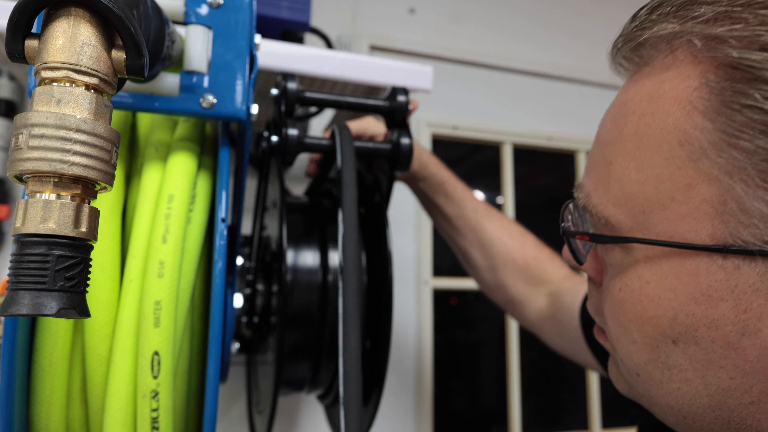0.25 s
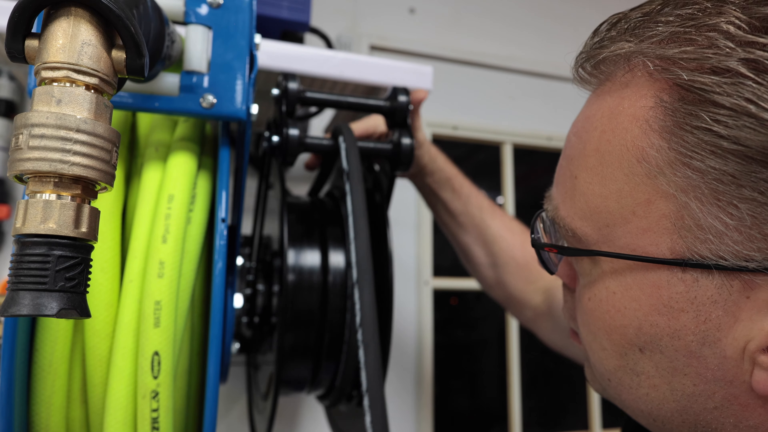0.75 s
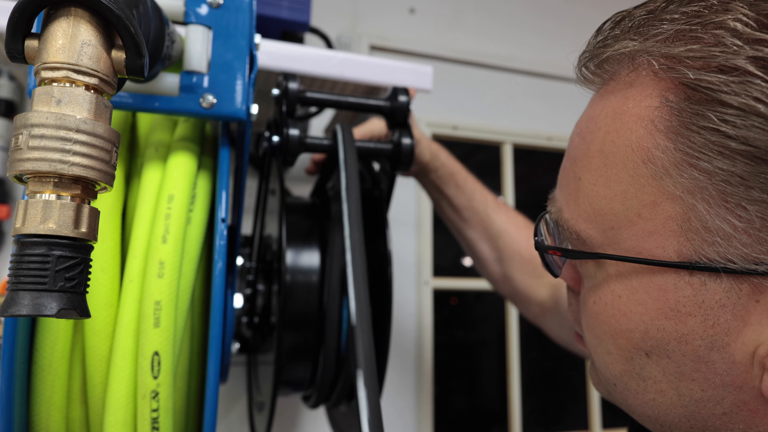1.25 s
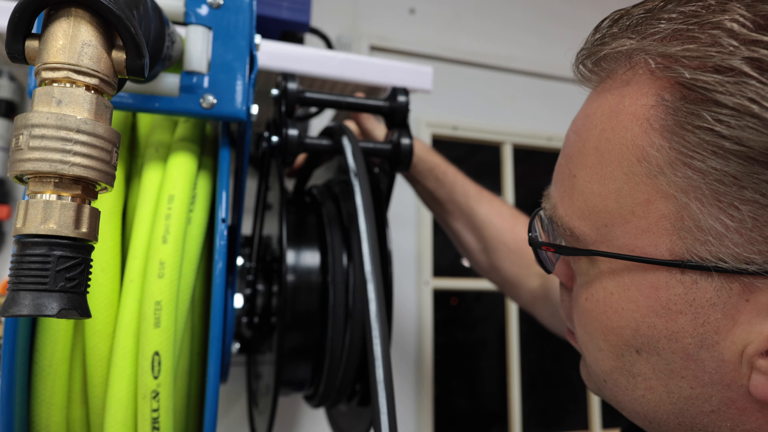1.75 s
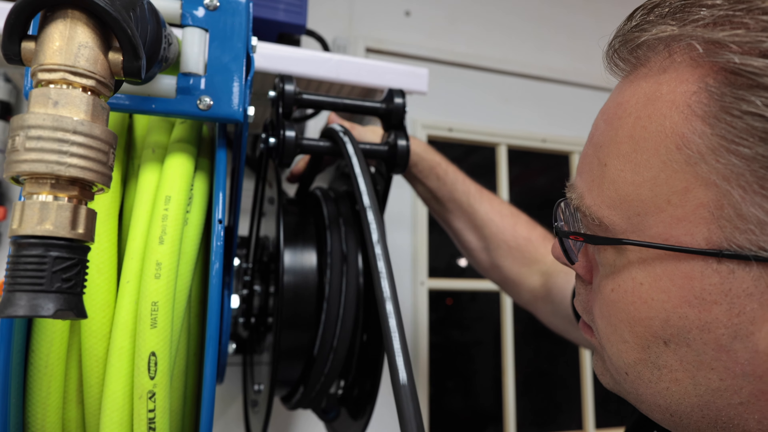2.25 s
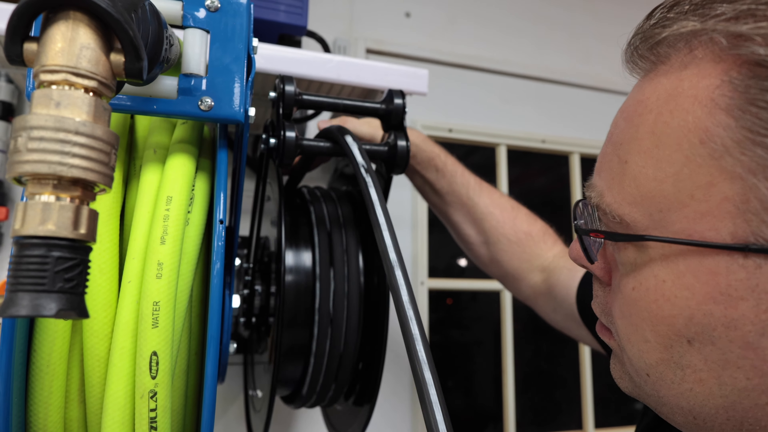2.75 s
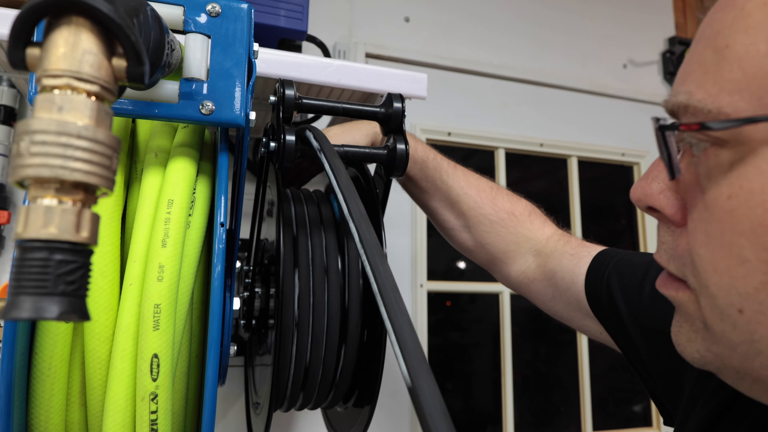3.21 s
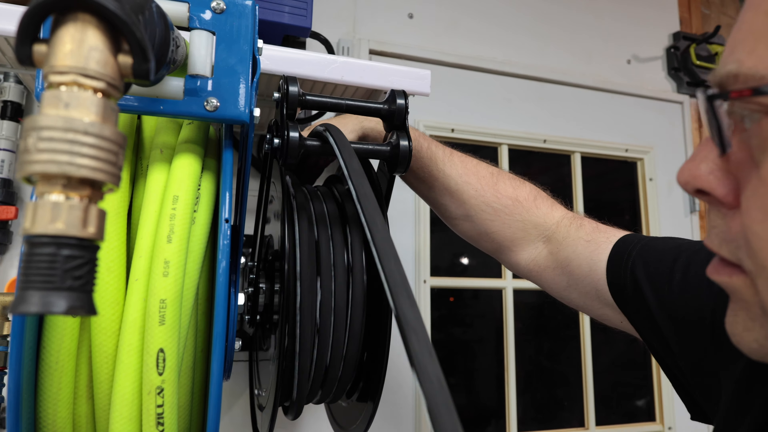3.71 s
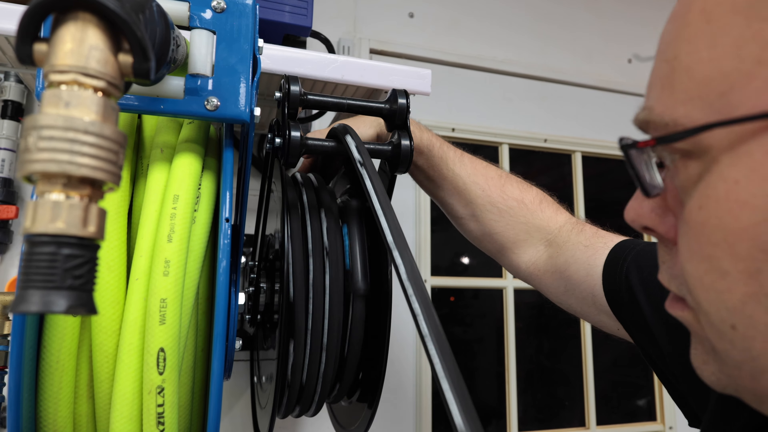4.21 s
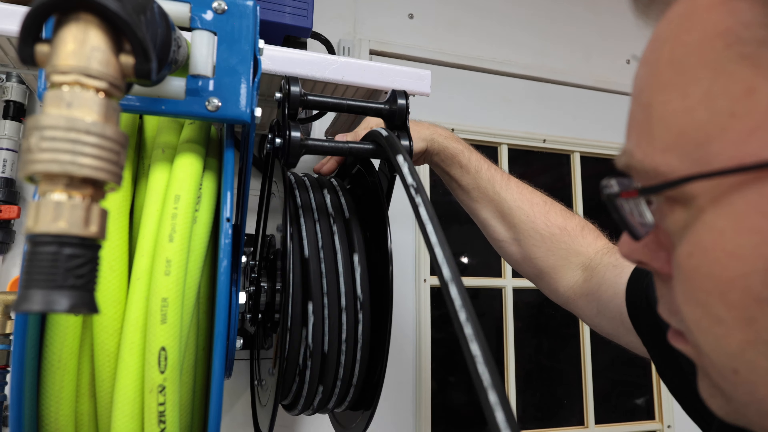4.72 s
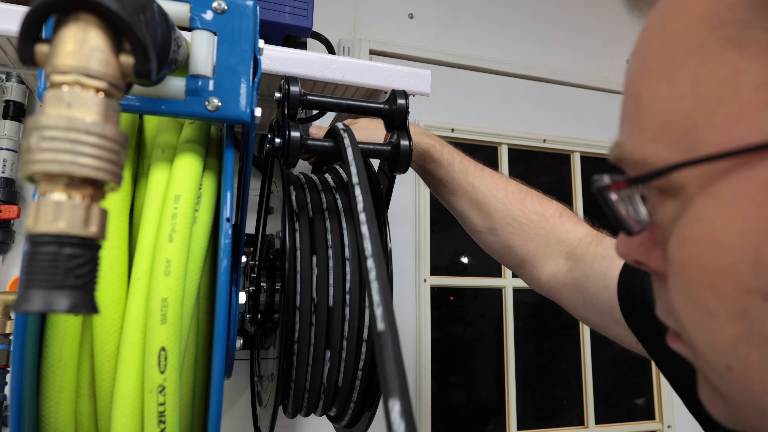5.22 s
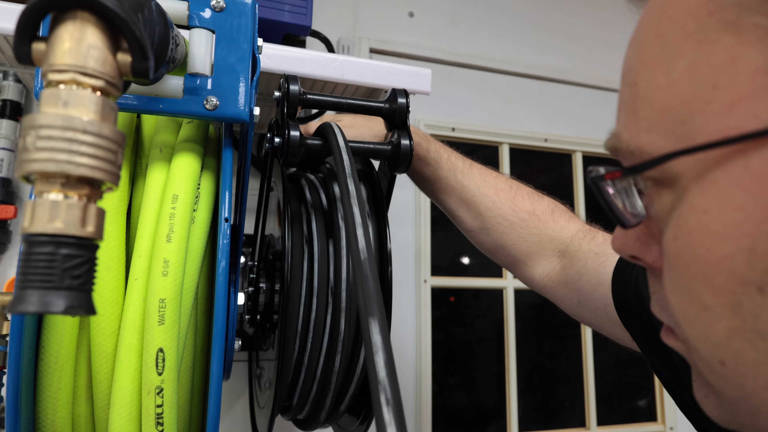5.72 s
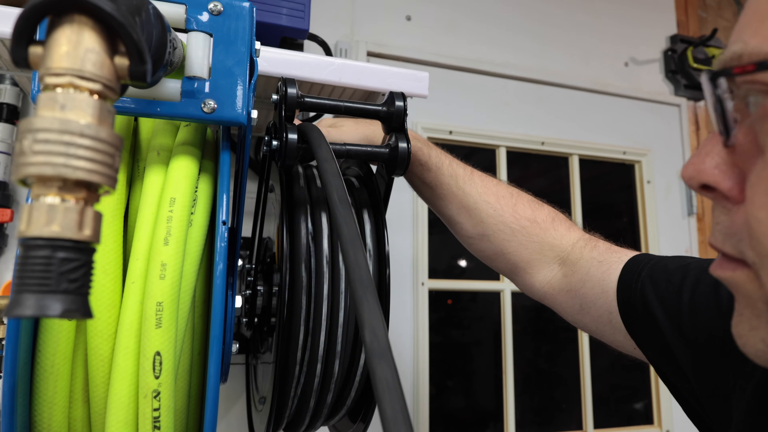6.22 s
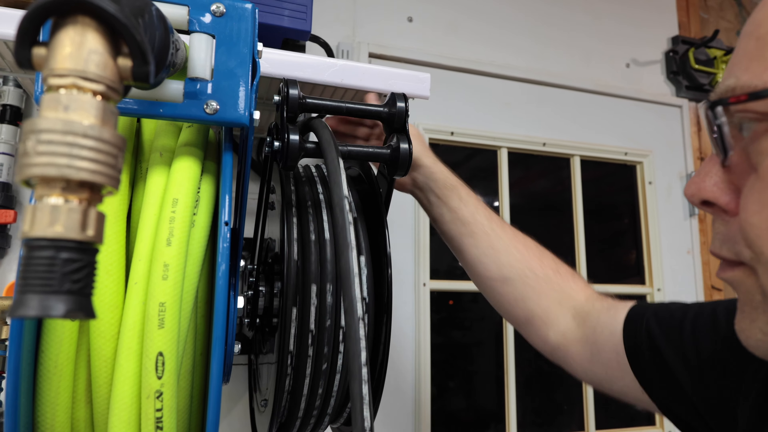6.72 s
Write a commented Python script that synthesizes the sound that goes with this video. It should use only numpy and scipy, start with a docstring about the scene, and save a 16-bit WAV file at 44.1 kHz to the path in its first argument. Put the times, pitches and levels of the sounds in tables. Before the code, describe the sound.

In a garage, a spring-driven steel reel winds in a stiff hose, close to the microphone. The pawl clacks over the ratchet in quick groups, ringing the metal, while the hose rubs the guide rollers and knocks dully on the drum over a low handling rumble. After a split second of silence, the winding returns sped up and quieter, in short gusts of rattle.

```python
"""A pawl clacks in groups over the ratchet teeth of a sheet-steel spring reel as it winds in a stiff hose.
The place is a garage, the camera microphone close to the reel. Each blow rings the steel; the hose rubs
the guide rollers, knocks the drum and flops, over a low rumble of handling near the microphone.
After a cut to brief silence the winding is heard sped up and quieter, chopped into short gusts of rattle."""
import sys
import numpy as np
from scipy import signal
from scipy.fft import rfft, irfft, next_fast_len
from scipy.io import wavfile
from scipy.ndimage import uniform_filter1d

SR = 44100
rng = np.random.default_rng(int(sys.argv[2]) if len(sys.argv) > 2 else 0)


def dump_mix(stems):
    """Bounce the given channels to the path in sys.argv[1] as a 16-bit WAV at rate SR."""
    frames = np.atleast_2d(stems).T  # one column per channel
    limited = np.clip(frames, -1, 1)  # hard clip at full scale
    pcm = np.round(limited * 32767).astype(np.int16)
    wavfile.write(sys.argv[1], SR, pcm)


N = 306615
T = np.arange(N) / SR
SILENCE_S = (2.495, 2.549)
SLOW, SPED_UP = T < SILENCE_S[0], T > SILENCE_S[1]

# Reverberation of the garage: f/Hz, t60/s before each passage shortens it
GARAGE_DECAY = [(400, 0.64), (1200, 0.66), (3500, 0.55), (9000, 0.35)]
# Handling near the microphone and the hose flopping:
# t/s, rumble/dB, nominal rise/ms, nominal fall/ms, drone/dB and flop/dB re the rumble
LOW_LURCHES = [(0.13, -63, 150, 200, -13, -16), (0.53, -67.5, 270, 90, 4, 19.5),
               (0.78, -64.5, 115, 150, 14, 23.5), (1.03, -62.5, 120, 200, 6, 19),
               (1.3, -57, 130, 151, 11, 18.5), (1.46, -61.5, 65, 60, 16, 24),
               (1.6, -35.5, 35, 90, -5.5, -19), (1.665, -32.5, 60, 110, -2, -11.5),
               (1.82, -46, 90, 60, -1.5, -7), (2.15, -43, 91, 150, 5, 1), (2.25, -49.5, 70, 200, -1, -20),
               (2.44, -51, 110, 120, -10.5, -22), (2.68, -54, 40, 90, 8, -3), (2.76, -66, 40, 70, 10, 5),
               (2.951, -46, 50, 51, -2, -7), (3.34, -62, 40, 40, -2, -3), (3.43, -74.5, 30, 60, 17, 21),
               (3.53, -70, 29.9, 40.2, 14, -7), (3.8, -69, 40, 90, 9, 20.5), (4.37, -78, 20, 60, 20, 23),
               (4.605, -75, 20, 40, 26, 34.5), (4.65, -79, 64, 60, 5, 34), (4.78, -78, 60, 90, 18, 12),
               (5.03, -60, 50, 50, -3, -8), (5.09, -58.5, 30, 60, -13, -11), (5.19, -60, 50, 50, 4.5, -11),
               (5.35, -80, 50, 90, 20.5, 13), (5.61, -65, 30, 90, 11, 3), (5.97, -60, 57, 60, 7, 8),
               (6.15, -45, 30, 30, -6, -10), (6.309, -39.5, 40, 50, -8.5, -17),
               (6.415, -43.5, 40, 70.5, -3, -18), (6.68, -79, 30, 60, 11, 18)]
# Hose running slowly over the guide rollers: t/s, nominal rubbing/dB, roller f/Hz, whirr/dB
HOSE_RUN = [(0.0, -50.5, 1014, -53), (0.12, -64, 1043, -62), (0.33, -64, 1150, -56.5),
            (0.44, -66.5, 1170, -57), (0.6, -67, 1160, -70.5), (0.74, -65, 1157, -67),
            (0.83, -56, 1014, -51), (0.95, -51.5, 1027, -43.5), (1.06, -47, 890, -43),
            (1.15, -57, 1101, -52), (1.27, -48, 971, -43), (1.38, -45.5, 1029, -40), (1.5, -53, 973, -51),
            (1.69, -61, 1051, -54.5), (1.8, -65, 1000, -58.5), (1.91, -56, 1000, -50),
            (2.07, -41, 1015, -34), (2.2, -64.5, 891, -59), (2.3, -61.5, 1056, -62),
            (2.5, -65.5, 1072, -55)]
# Short hollow rubs of the hose: t/s, level/dB, rise and fall/ms, f/Hz
HOLLOW_RUBS = [(2.765, -52, 20, 419), (3.18, -54, 20, 400), (3.805, -49, 18, 400), (4.655, -39, 37, 490),
               (5.385, -53, 17, 430), (5.555, -52, 24, 429), (5.85, -52.5, 20, 430),
               (5.975, -47, 19, 450.6), (6.2, -51, 20, 430)]
# Hose striking the drum: t/s, peak/dB, boost of the modes after the second/dB, of the hollow second/dB
HOSE_KNOCKS = [(0.104, -46, 10, 19), (0.412, -41.5, -4, 2), (0.474, -21, 3, 6.5), (0.733, -25.5, 3.5, -8.5),
               (1.063, -36.5, 3.5, 1), (1.251, -30, 3, -4.5), (1.934, -21.5, -4, -7.5),
               (2.132, -35, 3.5, 0.5)]
# Low modes of the drum: f/Hz, relative level/dB, t60/s
DRUM_MODES = [(130.3, -4, 0.29), (270.8, -6, 0.34), (162, -7, 0.16), (398, -1, 0.087), (603.6, -7, 0.16),
              (690, -3.5, 0.049), (1170, -11, 0.099)]
# Blows that ring the flange: t/s, nominal level/dB
FLANGE_BLOWS = [(0.02, -44.5), (0.11, -44), (0.37, -41), (0.73, -65), (1.08, -44), (1.25, -27), (1.39, -27),
                (1.429, -31), (1.47, -22.5), (1.93, -31), (2.15, -21.5), (2.46, -46.5), (2.67, -36),
                (2.96, -37), (3.17, -50), (3.37, -51), (3.718, -34), (4.03, -35), (4.141, -24.5),
                (4.305, -40), (4.445, -33.5), (5.18, -48), (5.61, -38.5), (5.895, -33), (6.039, -35),
                (6.14, -36), (6.29, -43), (6.68, -45), (6.8, -67)]
# Modes of the sheet steel: f/Hz, width/Hz before each passage scales it, relative level/dB
STEEL_MODES = [(775, 67, -2), (969, 32, -6), (1520, 41, -1), (1980, 24, -8), (2120, 26, -6), (2340, 50, -3),
               (2800, 29, -6), (2980, 37, -5), (3210, 71, 0), (3660, 65, -9), (4200, 35, -13),
               (4440, 71, -12), (5430, 88, -17), (6190, 100, -10), (6800, 52, -14), (8560, 59, -21),
               (8980, 40, -20), (9320, 65, -16), (9990, 75, -22), (10200, 34, -21), (10800, 210, -21)]
# Broad response of the steel between its modes: f/Hz, relative level/dB
STEEL_BODY = [(300, -22), (800, -6.5), (1300, -9), (2000, -15), (3200, -12.5), (4200, -18.5), (5200, -21.5),
              (7000, -21), (10000, -24.5), (15000, -41.5)]
# Bands of the steel (pawl, drum, tick, sizzle, clink, chime, clunk): low f/Hz, high f/Hz
STEEL_BANDS = [(1800, 5000), (500, 1800), (5000, 9000), (9000, 17000), (3100, 3350), (6050, 6350),
               (720, 860)]
# Gusts of sped-up rattle: crest t/s, level/dB, nominal rise/ms, nominal fall/ms,
# then weight on the drum/dB, tick/dB and clink/dB re the pawl band
RATTLE_GUSTS = [(2.57, -47.5, 18, 26, -3.5, -3.5, -13), (2.632, -47, 51, 100, -6.5, -20, -20),
                (2.679, -41, 37, 21, 1.5, 0, -25), (2.741, -47.5, 4.4, 42, -7, -6, 2),
                (2.82, -46.5, 58, 73, -6, -20, -11), (2.844, -43, 11, 23, 4, 2.5, -19),
                (2.894, -45, 14, 51, -3, 0, -6), (2.931, -36.5, 42, 34, -5.5, -11.5, -23),
                (2.95, -51.5, 4, 31, 10, 8.5, -17), (3.087, -49, 15, 46, -10, -13.5, -16),
                (3.153, -39, 50, 44, -4.5, -8.5, -19), (3.214, -43, 21, 7.6, 1.5, 1, -12),
                (3.233, -38.5, 24, 61, -5, -7, -16), (3.271, -47, 17, 20, 8, 0, -11),
                (3.331, -42.5, 27, 83, -7.5, -8.5, 3), (3.372, -39.5, 43, 22, 0.5, -8.5, -19),
                (3.414, -50, 6.5, 35, 0, 7, -13), (3.455, -49.5, 85, 42, -9, -17, -17),
                (3.571, -59.5, 5, 13, 5.5, -29.5, -16), (3.683, -57.5, 20, 21, -1.5, -22, -22),
                (3.706, -51, 10.4, 23, 18.5, 8.5, -14), (3.794, -43, 22, 10.7, -7, -13, 2),
                (3.865, -41.5, 85, 14, -5.5, -19, 3), (3.874, -48, 11, 21, 10, 4.5, -12),
                (3.94, -43, 16, 16, -12, -1, -6), (3.999, -46.5, 97, 53, -3.5, -22, -23),
                (4.019, -43.5, 11, 37, 6, -2.5, -6), (4.083, -42.5, 21, 22, 1.5, -2.5, 9),
                (4.115, -28, 20.7, 50, -8.5, -20, 2), (4.137, -48.5, 9.7, 26, 22, 14.5, -11),
                (4.204, -42.5, 6.7, 26, -5.5, 1, -16), (4.24, -41, 19, 66, -11, -10.5, -22),
                (4.293, -40, 23, 27.4, 6.5, -5, -2), (4.361, -42.5, 14.5, 33, 0, -9, -11),
                (4.395, -41.5, 35, 81, -2, -15, -9), (4.437, -44.5, 22, 26.5, 16, 5, -21),
                (4.483, -45, 5.7, 28, 5, 5, -12), (4.521, -34.5, 29, 37, -7.5, -4.5, 6.5),
                (4.559, -47, 19, 25, 5, 4, -18), (4.646, -53.5, 28, 75, 8, -19, -11),
                (4.714, -45.5, 18, 29, -5, -17, 8.5), (4.776, -53.5, 36, 200, -4, -31, -3),
                (4.847, -46.5, 24, 18, 2.5, 1, -12), (4.931, -48, 13, 44, -5, -13, -29),
                (4.995, -65, 48, 16, 0, -24, 6), (5.083, -55.5, 6, 12, 1, -34, -14),
                (5.147, -58, 64, 11, -1, -28, -16), (5.169, -59, 14.5, 30, 20.5, 12.5, -11),
                (5.348, -58, 4.7, 39, -8, -10, -9), (5.379, -55.5, 25, 67, 0.5, -17, -2),
                (5.418, -47, 18, 22, -8, -12, -1), (5.452, -41, 33, 20, -6.5, -17, -11),
                (5.471, -50.5, 17, 24, 11, 1, -16), (5.526, -44, 6.4, 24, -5, -1.5, -15),
                (5.56, -50, 12, 100, -11, -5, -6), (5.595, -41.5, 85, 27, -1, -10, -14),
                (5.651, -55.5, 16, 9.1, 10, -12, -9), (5.673, -50, 9.4, 63, 0, -10, -13),
                (5.718, -44.5, 9.4, 19, -7, -14, 5), (5.748, -41.5, 25, 35, -4, -21, -11),
                (5.77, -47, 13, 22, 5, -3, -19), (5.835, -48.5, 40, 19, -1.5, -4, -19),
                (5.856, -39.5, 13.5, 75, -7.5, -15, -15), (5.893, -49.5, 8, 29, 7.5, 2.5, -7),
                (5.956, -45, 6.4, 38, -8, -5, 8.5), (6.039, -40.5, 82, 11, -1.5, -9, -22),
                (6.108, -39.5, 52, 73, -0.5, -5.5, -15), (6.198, -49.5, 36, 23, 3.5, -6, -8),
                (6.256, -46, 93, 71, -4.5, -27, -18), (6.283, -51, 12, 15, 12.5, 9, -9),
                (6.395, -56, 14, 25, -7, -5.5, -20), (6.437, -62, 78, 70, 2.5, -22, -15),
                (6.505, -50, 9, 18, -6, -25, -12), (6.533, -59, 35, 66, -3, -31, -22),
                (6.602, -63, 6.6, 23, 4, -23, -1.5), (6.669, -54, 5.5, 45, 8, -5, 1),
                (6.867, -55.5, 5.4, 46, -13, -11, -1), (6.889, -59, 13, 85, 5.5, -23, 6),
                (6.94, -53, 4.6, 38, -5, -31, 8)]
# Some clacks also ring a low clunk from the drum: t/s, level/dB
DRUM_CLUNKS = [(0.01, -48), (1.016, -24.5), (1.056, -34.5), (1.073, -23), (1.255, -24), (1.322, -27.5),
               (1.457, -42), (1.915, -30.5), (2.131, -25), (2.146, -22.5)]
# Pawl dropping on the teeth: t/s, nominal peak/dB, nominal fall/ms,
# then weight on the drum/dB, tick/dB and clink/dB re the pawl band
PAWL_CLACKS = [(0.002, -47, 70, 4, -3, -20), (0.77, -49.5, 90, -6, -25, 3), (1.83, -52.5, 70, -3, -25, 3),
               (0.1072, -44.5, 18, -13, -13, -15), (0.3535, -21, 20, -9.5, -5.5, -21),
               (0.405, -28, 21, -12, -33, -14.5), (0.414, -33, 11, 6, -33, -13),
               (0.474, -38, 34, 8.5, -20, -12), (0.7317, -41.5, 60, 6.5, -27.5, -16.5),
               (0.82, -36.5, 28, 3, -28, -5), (0.8754, -40.5, 26, -9, -22.5, -8),
               (0.8909, -18.5, 21, -8.5, -21, -1.5), (0.94, -14, 18, -16, -14.5, -5.5),
               (0.979, -11, 23, -16.5, -15.5, -15), (1.0141, -7.5, 13, -8.5, -23.5, -23),
               (1.053, -21.5, 31, 9, 1.5, -22), (1.0714, -30, 31, 2, -0.5, -17.5),
               (1.089, -30.5, 13, 4, -13.5, -19), (1.2327, -17, 24, -2, 2, -7),
               (1.254, -12, 17, -9, -21, -24), (1.2816, -20.5, 54, -5, -20.5, -14.5),
               (1.322, -7.5, 21, -5.5, -10.5, -4.5), (1.349, -9, 25, -9.5, -9, -17.5),
               (1.3754, -6.5, 17, -12.5, -18, -23.5), (1.404, -9.5, 24, -15, -15.5, -23.5),
               (1.4448, -28, 38, -11.5, -18, -9), (1.4548, -21.5, 36, 3, -1, -18),
               (1.4845, -33, 19, 11.5, -2.5, -19.5), (1.6575, -39.5, 24, 2.5, -15.5, -28),
               (1.9125, -13.5, 15, -10.5, -3, 0.5), (1.932, -13, 26, -2.5, -10, -4),
               (1.9505, -23.5, 43, 1, -19.5, 9), (1.9745, -21.5, 46, -5.5, -26.5, 2),
               (2.0028, -12, 18, -9, -13, -20.5), (2.0278, -13.5, 18, -7.5, -16.5, 6.5),
               (2.056, -9.5, 20, -14, -16, -10.5), (2.0892, -9.5, 25, -10, -20.5, -20.5),
               (2.13, -24.5, 25, 2, 0, -20), (2.1427, -21.5, 13, 4.5, -2.5, -14),
               (2.1613, -23, 19, 7, -3, -33)]

# A band's share of a blow: base/dB, then dB per dB of weight, of tick, of level above the median
CLACK_SIZZLE, CLACK_CHIME = (-3, 0.43, 1.25, -0.03), (-11.5, -0.1, 0.7, 0.04)
CLACK_CLUNK = (-16.5, 0.9, 0.1, 0)
GUST_SIZZLE, GUST_CHIME = (-7, 0.19, 0.83, -0.18), (-7.5, -0.49, 0.8, 0.12)
FLANGE_HZ, SHRILL_HZ = 1546, 13550


def undb(db):
    """dB to gain."""
    return 10 ** (np.asarray(db, float) / 20)


def unit(x):
    """Scale to rms 1."""
    return x / np.sqrt(np.mean(x ** 2))


def band(x, lo_hz, hi_hz):
    """Band-pass."""
    return signal.sosfilt(signal.butter(2, [lo_hz, hi_hz], "band", fs=SR, output="sos"), x)


def grit(grain_ms, rough_db, count=1):
    """Noises whose size jumps together from grain to grain, as many tiny contacts do."""
    grain = int(grain_ms * SR / 1000)
    size = uniform_filter1d(np.repeat(rng.standard_normal(N // 8), grain)[:N], grain)
    return unit(rng.standard_normal((count, N)) * undb(rough_db * size))


def wavering(hz, width_hz):
    """A tone whose size and phase wander, like a narrow resonance fed by rubbing."""
    noise = rng.standard_normal(N) + 1j * rng.standard_normal(N)
    drift = signal.lfilter([1], [1, -np.exp(-np.pi * width_hz / SR)], noise)
    phase = 2 * np.pi * np.cumsum(np.broadcast_to(hz, N)) / SR
    return unit((drift * np.exp(1j * phase)).real)


def bursts(crest_s, db, rise_ms, fall_ms, shares_db, bends, stretches):
    """One envelope a band, adding in power; a burst is down to a tenth at rise or fall times stretch."""
    t = T[::16]
    power = np.zeros((len(bends), len(t)))
    for (s, level, rise, fall), shares in zip(np.broadcast(crest_s, db, rise_ms, fall_ms), shares_db):
        ms = 1000 * (t - s)
        near = np.abs(ms) < 250
        apart = np.where(ms < 0, -ms / rise, ms / fall)[near]
        for row, share, bend, stretch in zip(power, (0, *shares), bends, stretches):
            row[near] += undb(level + share - 20 * (apart / stretch) ** bend) ** 2
    return np.array([np.interp(T, t, row) for row in np.sqrt(power)])


def swells(crest_s, db, rise_ms, fall_ms, bend):
    """A single envelope from a row of rises and falls."""
    return bursts(crest_s, db, rise_ms, fall_ms, [()] * len(crest_s), [bend], [1])[0]


def band_shares(blows, *laws):
    """dB re the pawl band for each blow: drum, tick, sizzle, clink, then a band for each further law."""
    weight, tick, clink = blows[:, -3:].T
    excess = blows[:, 1] - np.median(blows[:, 1])
    sizzle, *rings = [base + per_weight * weight + per_tick * tick + per_level * excess
                      for base, per_weight, per_tick, per_level in laws]
    return np.transpose([weight, tick, sizzle, clink, *rings])


def garage(x, decay_scale):
    """The walls answer with decaying noise, shorter in the treble."""
    t = T[:SR]
    tail = sum(band(rng.standard_normal(SR), hz / 1.51, hz * 1.75) * undb(-60 * t / (decay_scale * t60))
               for hz, t60 in GARAGE_DECAY)
    tail *= 1 - np.exp(-t / 0.018)
    return signal.fftconvolve(x, tail / np.sqrt(np.sum(tail ** 2)))[:len(x)]


def handling_and_flop(rubbing, gusting):
    """Handling by the microphone and the flopping hose: lows that go with the winding and lurch."""
    lurches = np.array(LOW_LURCHES)
    # rows: rumble, drone, flop
    power = bursts(*lurches[:, :4].T, lurches[:, 4:], bends=[1.2] * 3, stretches=(1.05, 0.95, 0.95)) ** 2
    power += np.where(SLOW, undb([[-72.5], [-63], [-66.5]]), undb([[-91], [-79], [-81]])) ** 2  # floor
    power[2] += (undb(-0.5) * rubbing) ** 2
    gust_power = np.abs(uniform_filter1d((gusting / undb(-44.5)) ** 2, int(0.027 * SR)))
    power += gust_power ** 0.53 * undb([[-95], [-60.5], [-56]]) ** 2
    rumble, drone, flop = np.sqrt(power)
    return (rumble * unit(band(wavering(42, 22), 21.9, 94))
            + drone * unit(band(wavering(128, 30), 96, 330))
            + flop * unit(band(grit(9.5, 4.7)[0], 240, 557)))


def roller_whirr():
    """The guide roller whirrs, its pitch following the hose speed."""
    s, _, hz, db = np.transpose(HOSE_RUN)
    return undb(np.interp(T, s, db)) * wavering(np.interp(T, s, hz), width_hz=79)


def hose_friction(rubbing):
    """Gritty force of the sliding hose on the first five bands; its colour shifts with the pressure."""
    band_db = np.array([[-49], [-47.5], [-59.5], [-66], [-68]])  # with the rubbing at -50 dB
    slopes = np.array([[1.05], [1.5], [1.6], [1.3], [1.2]])  # dB per dB of rubbing
    return undb(band_db) * (rubbing / undb(-50)) ** slopes * grit(5.5, 1.5, count=5)


def hollow_rubs():
    """Short rubs of the hose sound the inside of the drum."""
    s, db, ms, hz = np.transpose(HOLLOW_RUBS)
    return swells(s, db, ms, ms, bend=1.8) * wavering(np.interp(T, s, hz), width_hz=80)


def hose_knocks():
    """Dull blows of the hose ring the low modes of the drum, each blow in its own mix."""
    mixes = rng.uniform(0.19, 1, (len(HOSE_KNOCKS), len(DRUM_MODES)))
    t, out = T[:SR // 2], np.zeros(N)
    for (start, peak_db, upper_db, hollow_db), mix in zip(HOSE_KNOCKS, mixes):
        ring = np.zeros(len(t))
        for k, (hz, db, t60) in enumerate(DRUM_MODES):
            boost_db = (k > 1) * upper_db + (k == 1) * hollow_db
            ring += (-1) ** k * mix[k] * undb(db + boost_db - 60 * t / t60) * np.sin(2 * np.pi * hz * t)
        ring *= 1 - np.exp(-t / 0.0034)  # soft contact
        out[int(start * SR):][:len(t)] += undb(peak_db) * ring / np.abs(ring).max()
    return out


def flange_ring():
    """Some blows ring the flange: a rough swell, then a thin tone that dies slowly."""
    s, db = np.transpose(FLANGE_BLOWS)
    swell = swells(s, db - 4, rise_ms=29, fall_ms=19, bend=1.31) + SLOW * undb(-68.5)
    t60_s = np.where(s < SILENCE_S[0], 0.98, 0.52)
    t = T[::64]
    age = (t - s[:, None]) / t60_s[:, None]
    tails = (age > 0) * undb(db[:, None] - 26 - 60 * np.abs(age))
    tail = np.interp(T, t, tails.sum(axis=0))
    return swell * wavering(FLANGE_HZ, 30) + tail * wavering(1.01 * FLANGE_HZ, 14)


def squeal(envelopes):
    """Only blows that land more on the drum than on the pawl wake the shrill mode fully."""
    pawl, drum, _, sizzle = envelopes[:4]
    heavy = drum ** 2 / (pawl ** 2 + drum ** 2 + 1e-12)
    return sizzle * heavy ** 1.5 * wavering(SHRILL_HZ, width_hz=150)


def sheet_steel(force, width_scale, ring_db, scatter_db):
    """The reel rings with its modes over a broad body, each band answering a steady force with gain 1."""
    length = force.shape[1]
    size = next_fast_len(length + SR // 2)
    hz = np.fft.rfftfreq(size, 1 / SR) + 1e-3
    body_hz, body_db = np.transpose(STEEL_BODY)
    body = undb(np.interp(np.log(hz), np.log(body_hz), body_db))
    mode_hz, width, db = np.transpose([*STEEL_MODES, (SHRILL_HZ, 70, -22)])[:, :, None]
    modes = undb(db + ring_db) / (1 + 1j * (hz ** 2 - mode_hz ** 2) / (hz * width_scale * width))
    # clink, chime and clunk have blows of their own, so the broad pushes wake them less
    in_narrow_band = sum((mode_hz > lo) & (mode_hz < hi) for lo, hi in STEEL_BANDS[4:])
    muffled = modes * undb(-5 * in_narrow_band)
    # the contact wanders between three places, and each wakes the modes in its own mix
    chance = rng.standard_normal((3, len(modes)))
    mixes = undb(scatter_db * (chance - chance.mean(axis=0))) * (-1) ** np.arange(len(modes))
    hold = int(0.035 * SR)
    place = np.repeat(rng.integers(3, size=length // hold + 1), hold)[:length]
    spectrum = 0
    for k, mix in enumerate(mixes):
        contact = uniform_filter1d(1.0 * (place == k), 64)
        broad, narrow = body + mix @ muffled, body + mix @ modes
        for push, (lo, hi) in zip(force, STEEL_BANDS):
            detune = 1j * (hz ** 2 - lo * hi) / (hz * (hi - lo))
            answer = (broad if hi > 1.5 * lo else narrow) / (1 + np.sqrt(2) * detune + detune ** 2)
            spectrum += rfft(push * contact, size) * answer / np.sqrt(np.mean(np.abs(answer) ** 2))
    return irfft(spectrum, size)[:length]


def rattle_gusts():
    """The sped-up winding is chopped into short gusts: envelopes for every band but the clunk."""
    gusts = np.array(RATTLE_GUSTS)
    envelopes = bursts(*gusts[:, :4].T, band_shares(gusts, GUST_SIZZLE, GUST_CHIME),
                       bends=(2.09, 1, 0.67, 1.33, 0.59, 2.6),
                       stretches=(0.8, 0.98, 0.56, 0.64, 0.51, 0.52))
    envelopes[:2] += undb([[-86], [-73]])  # the reel never quite rests
    return envelopes


def sped_up_winding(gusts):
    """Sped-up rattle of the same reel, its ringing cut short, with whirr, hollow rubs and squeal."""
    force = gusts * grit(1.2, 2.6, count=6)
    rattle = sheet_steel(force[:, SPED_UP], width_scale=1.3, ring_db=-4.5, scatter_db=4)
    whirr = undb(-7) * gusts[1] * wavering(1000, width_hz=81)
    return rattle + (whirr + hollow_rubs() + undb(-4) * squeal(gusts))[SPED_UP]


def pawl_clacks():
    """The pawl drops on tooth after tooth: sharp force envelopes for all seven bands."""
    clacks = np.array(PAWL_CLACKS)
    s, db, fall_ms = clacks[:, :3].T
    return bursts(s + 0.0014, db - 7, rise_ms=3, fall_ms=fall_ms,
                  shares_db=band_shares(clacks, CLACK_SIZZLE, CLACK_CHIME, CLACK_CLUNK),
                  bends=(1.06, 0.89, 0.62, 1.8, 0.51, 1.5, 0.24),
                  stretches=(0.75, 1.41, 0.69, 0.85, 1.1, 1.3, 0.79))


def slow_winding(clacks, rubbing):
    """Close up, clacks, clunks and friction ring the steel while the hose knocks and the roller whirrs."""
    shrill = undb(-5) * squeal(clacks)
    force = clacks * grit(0.8, 3.8, count=7)
    s, db = np.transpose(DRUM_CLUNKS)
    force[6] += swells(s, db, rise_ms=3, fall_ms=20, bend=0.7) * grit(0.8, 2.9)[0]
    force[:5] += hose_friction(rubbing)
    reel = sheet_steel(force[:, SLOW], width_scale=0.5, ring_db=-2.4, scatter_db=4.7)
    return reel + (hose_knocks() + roller_whirr() + shrill)[SLOW]


def scene():
    """From beside the reel: slow winding in the garage, a cut, then the winding sped up and drier."""
    s, rubbing_db = np.transpose(HOSE_RUN)[:2]
    rubbing = SLOW * undb(np.interp(T, s, rubbing_db))
    gusts = rattle_gusts()
    slow = slow_winding(pawl_clacks(), rubbing)
    sped_up = sped_up_winding(gusts)
    out = (SLOW | SPED_UP) * (handling_and_flop(rubbing, SPED_UP * gusts[0]) + flange_ring())
    out[SLOW] += slow + undb(-15.5) * garage(slow, decay_scale=0.78)
    out[SPED_UP] += sped_up + undb(-22.5) * garage(sped_up, decay_scale=0.28)
    return out[None]


def record(dry):
    """The camera, its microphone close to the steel, flattens the loudest clacks and cuts the top."""
    ceiling, top_hz = 0.18, 15850
    flattened = dry / (1 + (dry / ceiling) ** 6) ** (1 / 6)
    return signal.sosfilt(signal.ellip(10, 0.2, 80, top_hz, fs=SR, output="sos"), flattened)


dry = scene()
out = record(dry)
dump_mix(out)
```